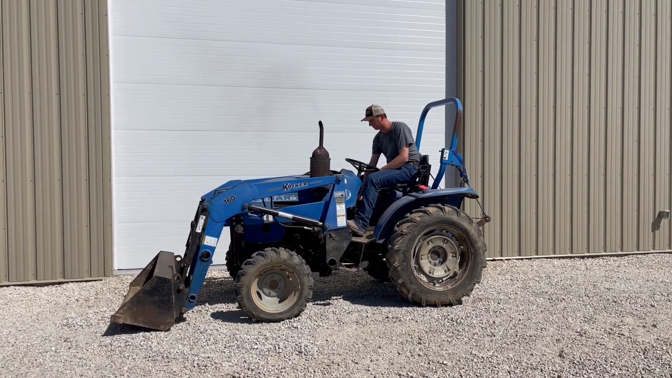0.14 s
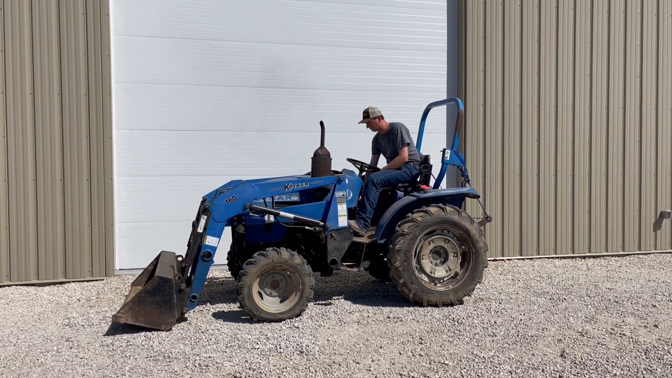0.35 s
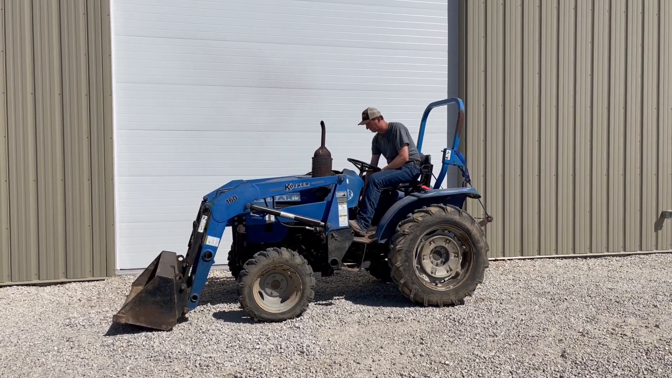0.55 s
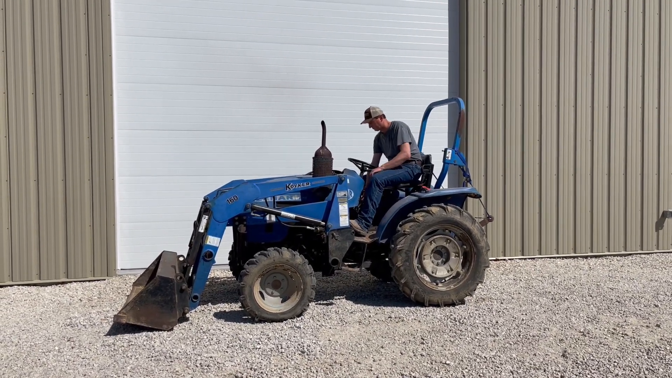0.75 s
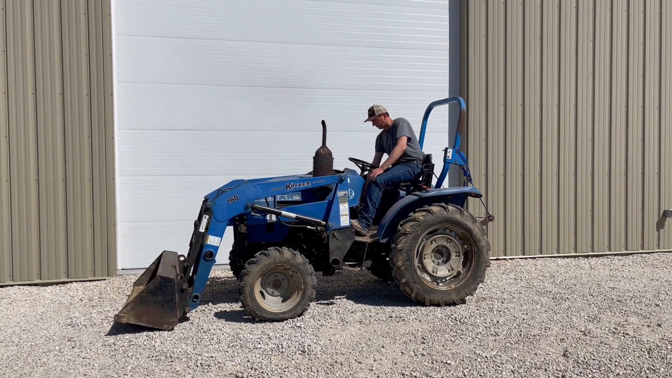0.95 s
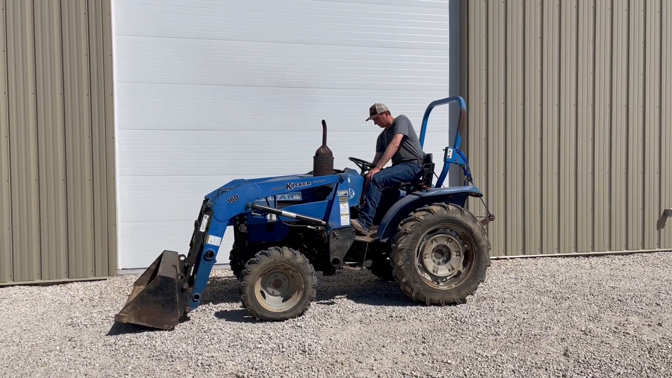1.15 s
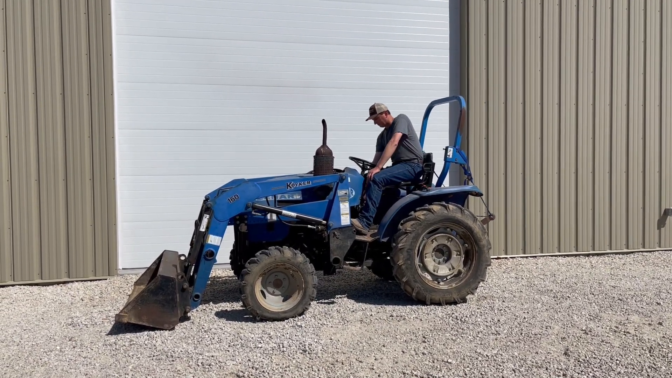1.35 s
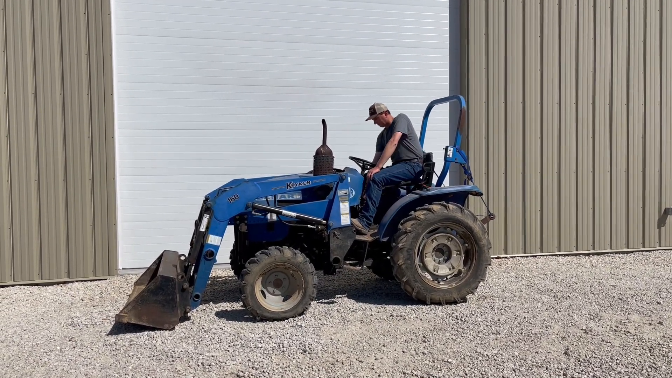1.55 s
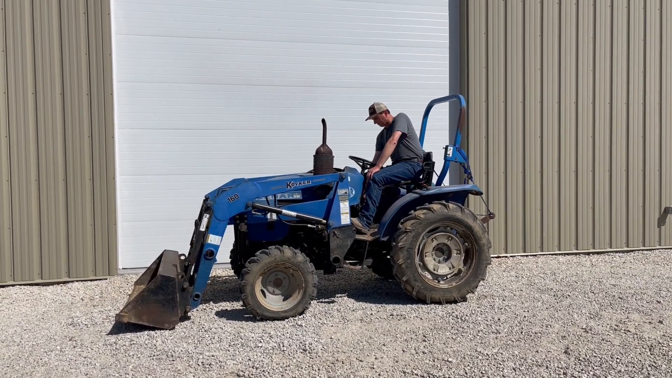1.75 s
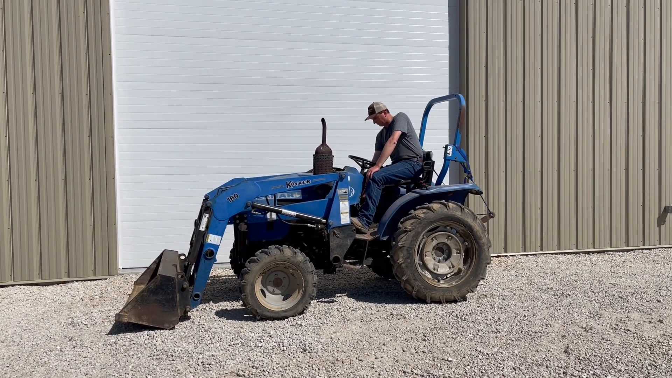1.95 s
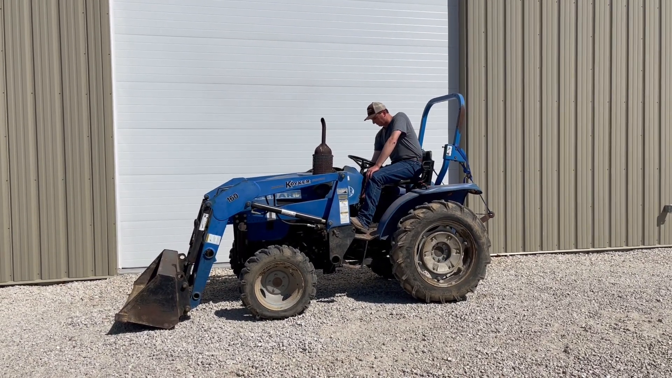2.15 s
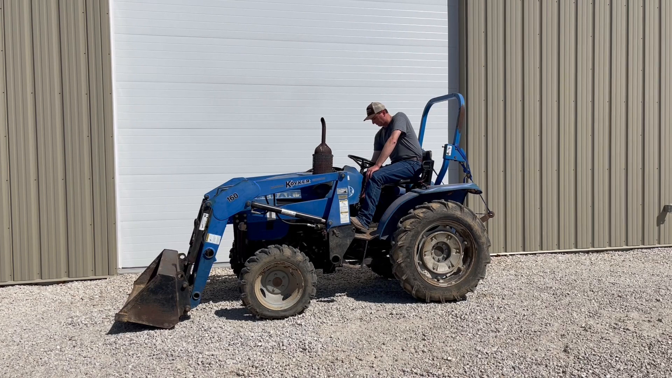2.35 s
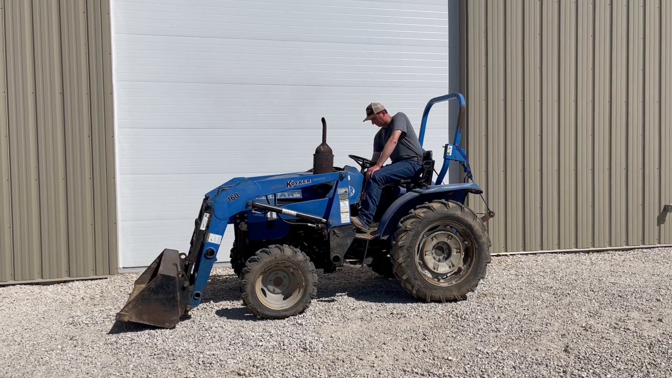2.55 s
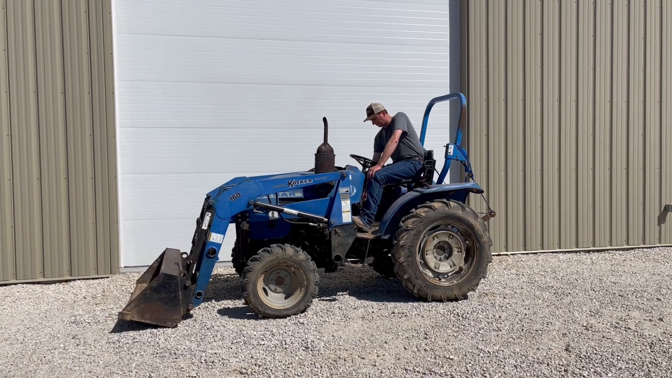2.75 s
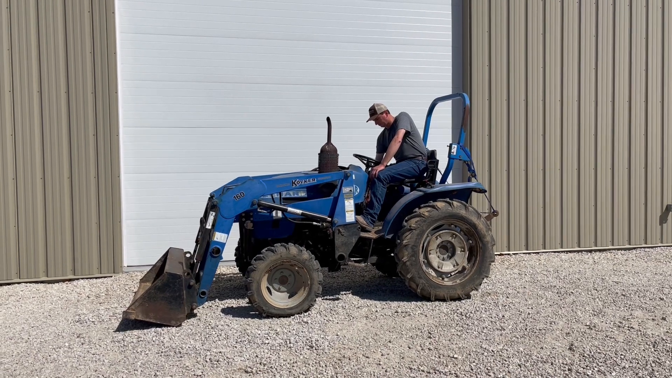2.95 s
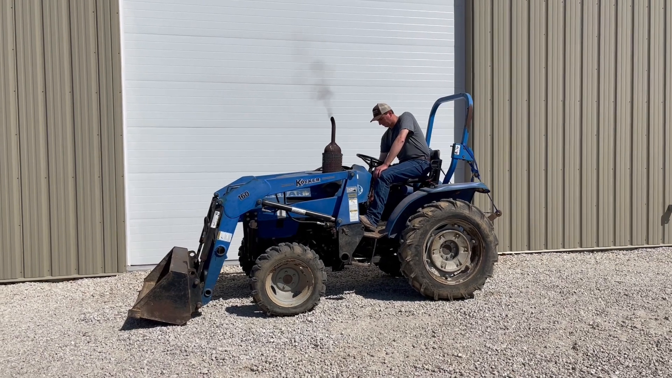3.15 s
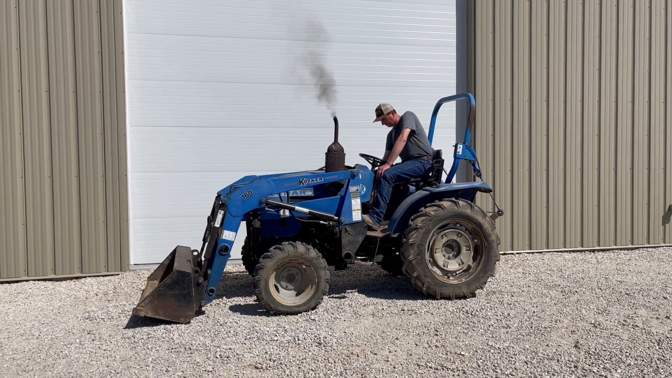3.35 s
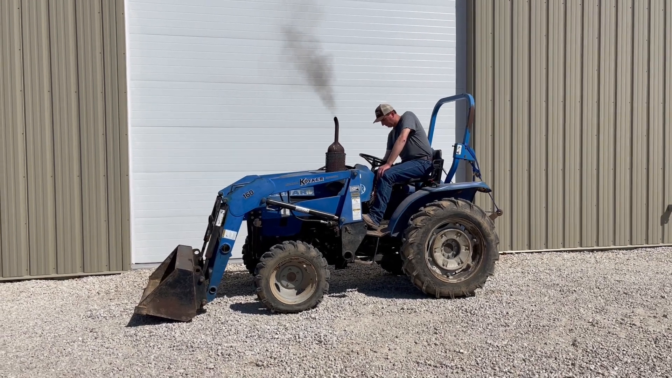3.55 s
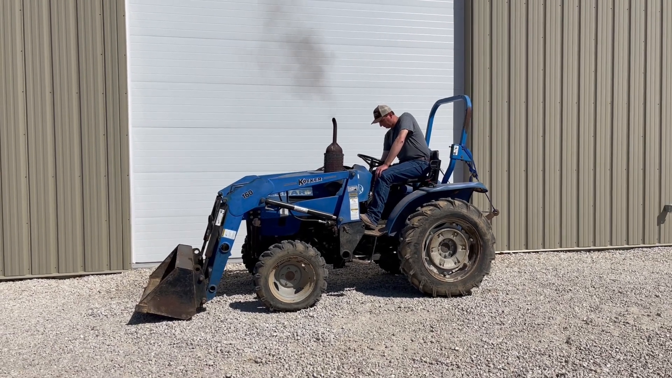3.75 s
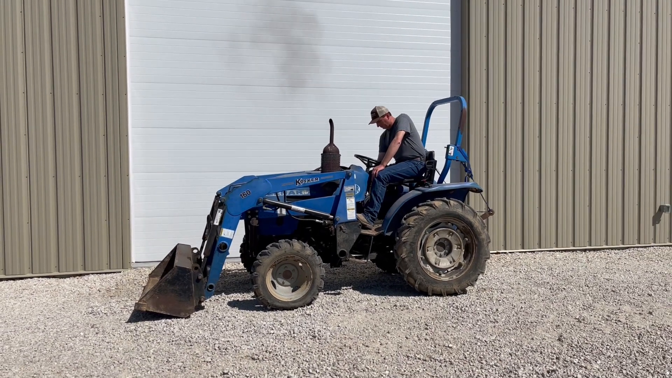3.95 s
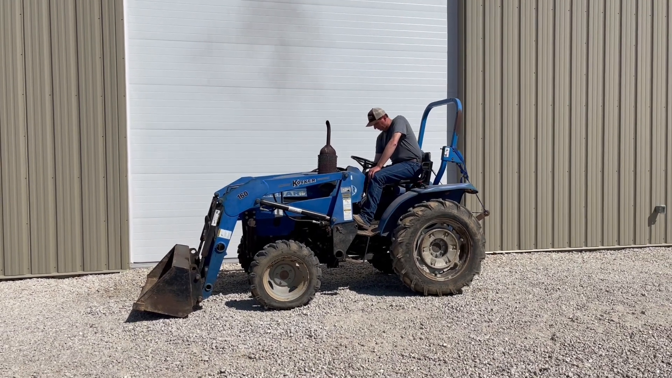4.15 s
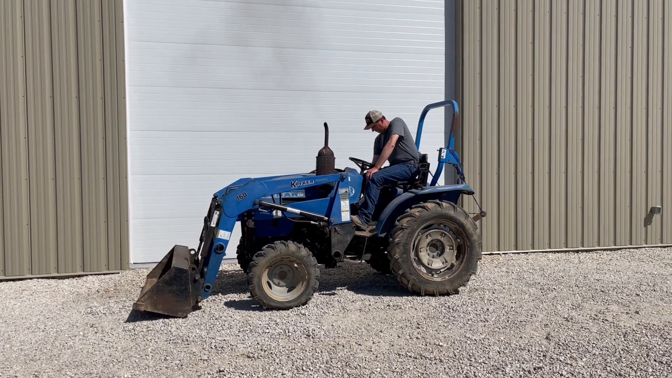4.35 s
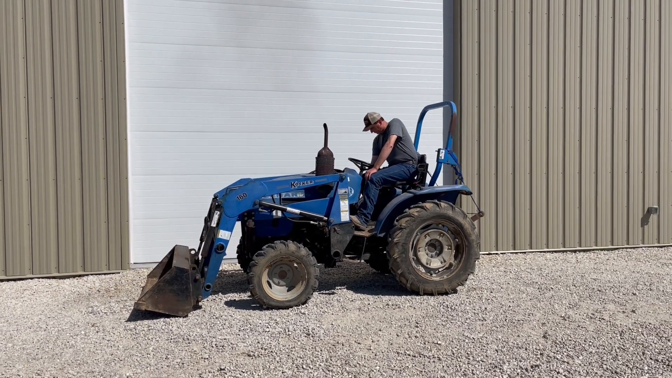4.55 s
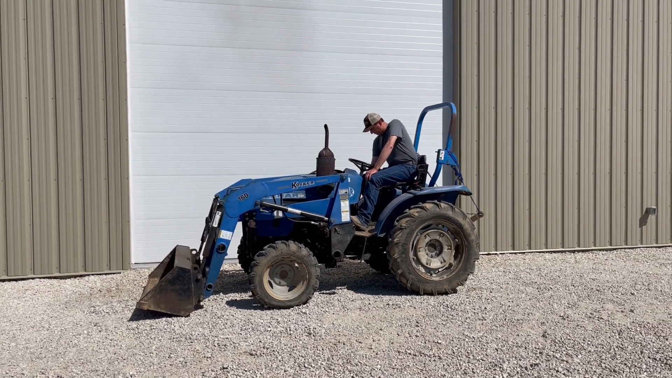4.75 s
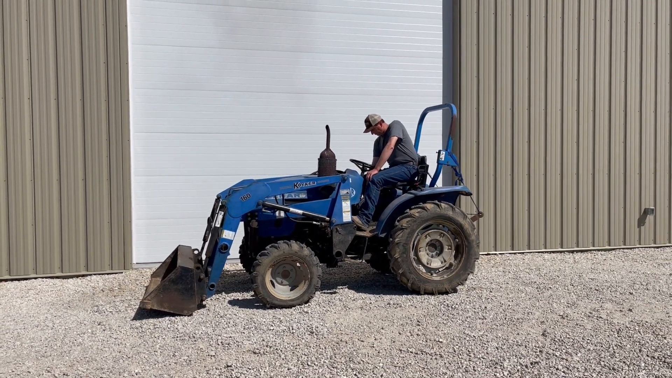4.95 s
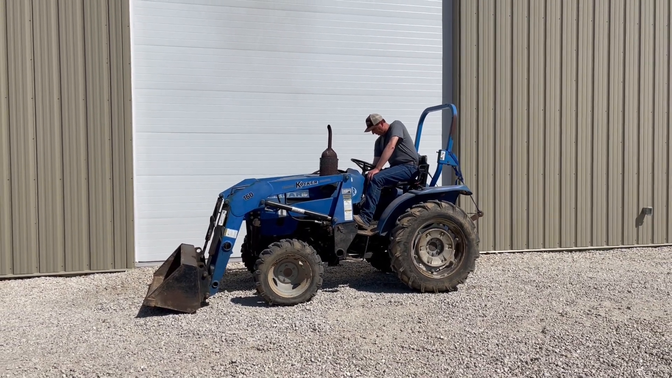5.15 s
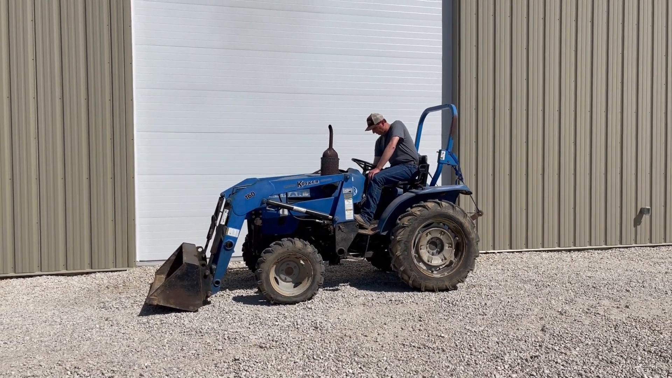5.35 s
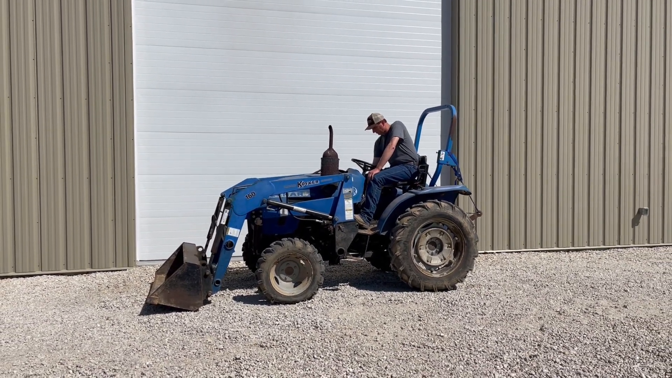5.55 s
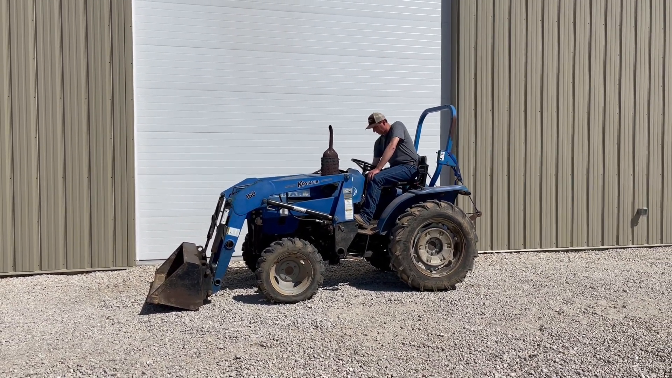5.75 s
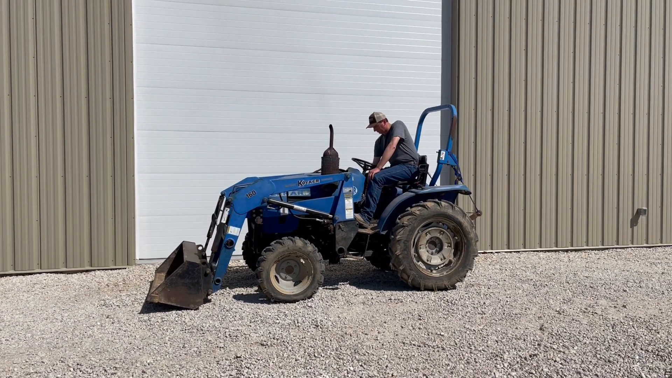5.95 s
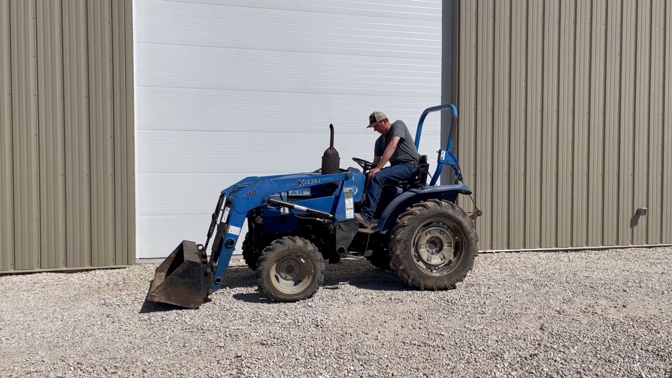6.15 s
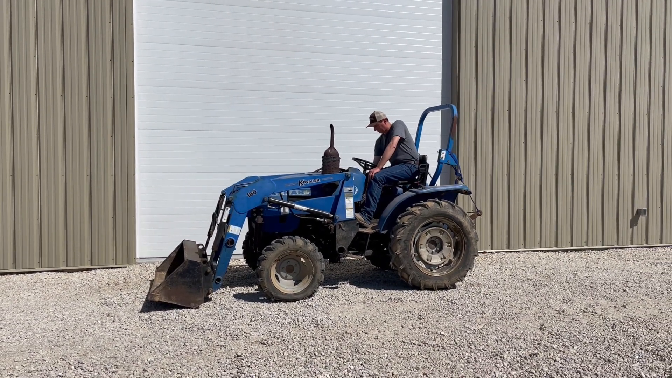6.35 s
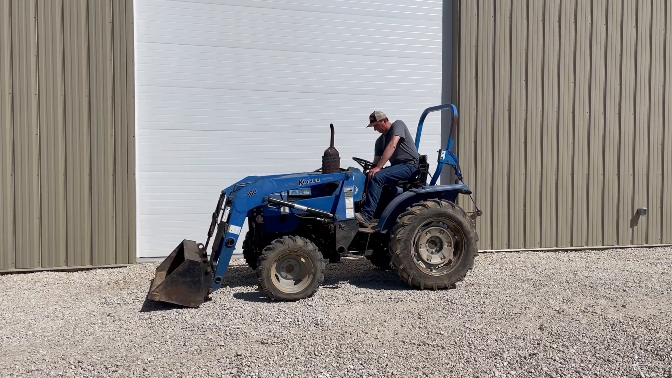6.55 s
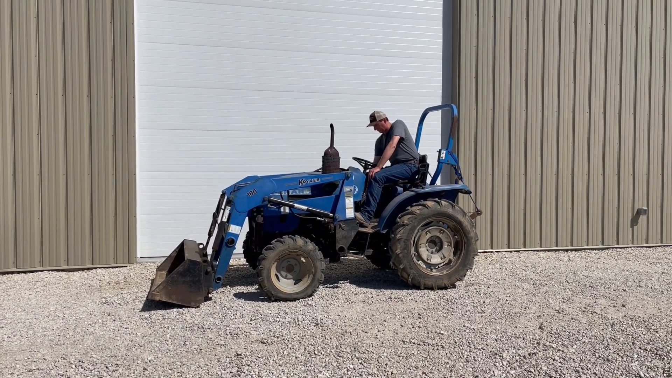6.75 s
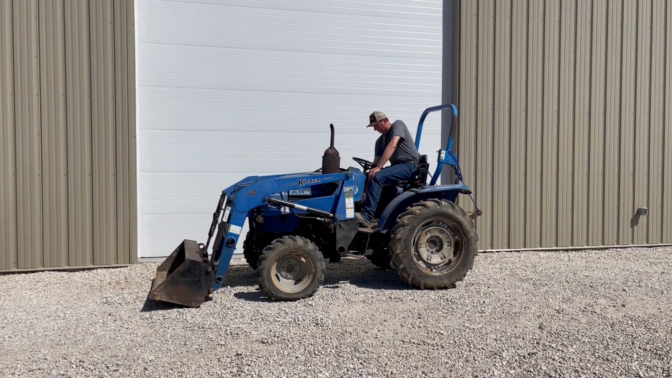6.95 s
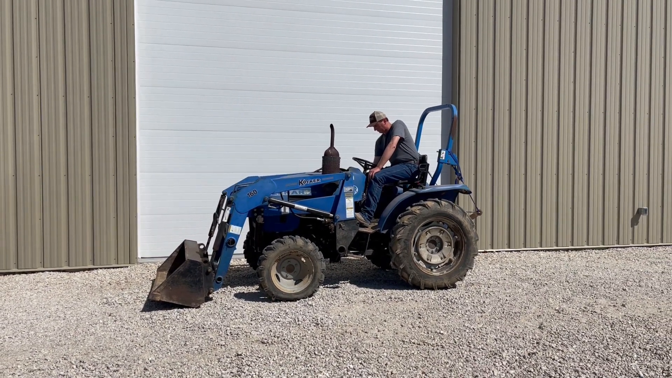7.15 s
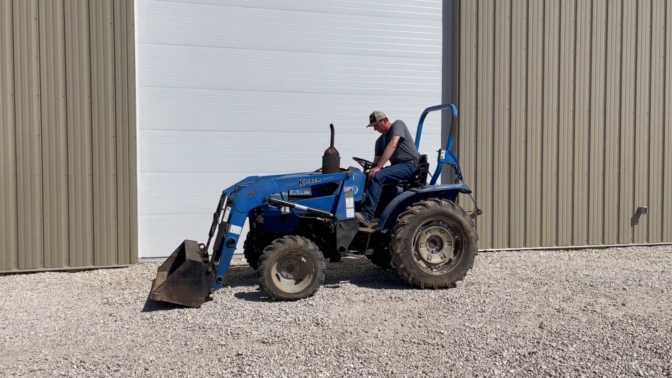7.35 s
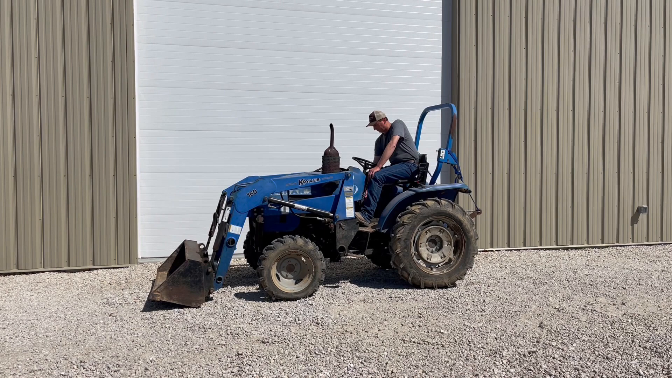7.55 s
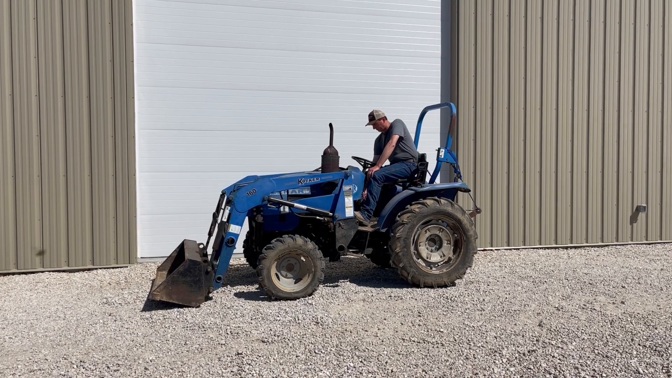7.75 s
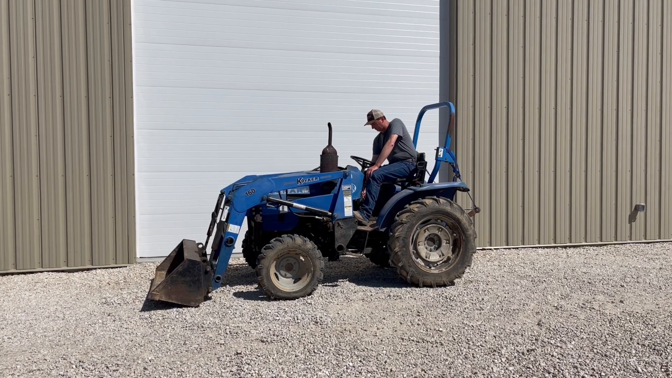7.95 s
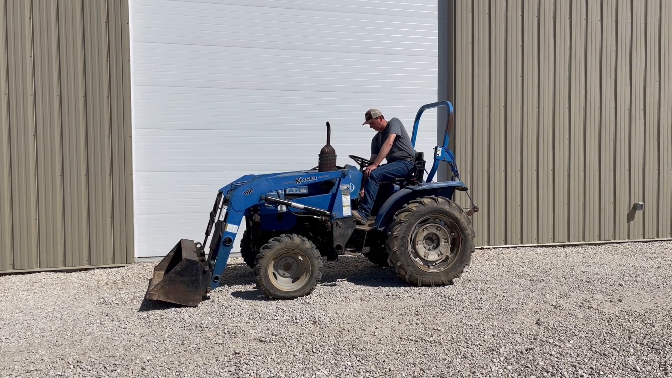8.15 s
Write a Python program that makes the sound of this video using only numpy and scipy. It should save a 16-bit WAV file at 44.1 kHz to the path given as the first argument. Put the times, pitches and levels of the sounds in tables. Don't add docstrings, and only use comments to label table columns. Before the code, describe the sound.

A small three-cylinder diesel tractor runs outdoors on gravel in front of a metal wall, heard in stereo from several metres away. From 0 to 2.7 seconds it idles slowly, about fifteen firings a second, with lumpy uneven knocks, one cylinder harder and rattling, valve ticks, soft exhaust puffs and buzzing thin panels. At about 2.8 it surges with a coughing exhaust, nearly doubling speed by 3.3, and holds briefly. From 3.9 to 4.7 it climbs again to a fuller, booming drone, steady until 5.6. A last harsh push lifts it to top speed by about 6.1, where it stays to the end at 8: loud, dense clatter merged into a roar, gear and fan wash, faint pump tones and a very thin high whine. A close wall echo thickens the knocks. Light wind bumps the microphones near 6.9 and again from 7.6.

```python
import sys
import numpy as np
from scipy import signal
from scipy.fft import rfft, irfft, next_fast_len
from scipy.io import wavfile
from scipy.ndimage import uniform_filter1d

SR = 44100
rng = np.random.default_rng(int(sys.argv[2]) if len(sys.argv) > 2 else 0)


def dump(signal):
    limited = np.clip(np.atleast_2d(signal).T, -1, 1)
    pcm = np.round(limited * 32767).astype(np.int16)
    wavfile.write(sys.argv[1], SR, pcm)


def undo_db(level):
    steps = np.asarray(level, float) / 20
    return 10 ** steps


N = 361619
TIME = np.arange(N) / SR

# time in seconds, firings per second.
ENGINE_SPEED = [(0.0, 15.19), (0.91, 14.98), (2.23, 15.06), (2.73, 15.27), (3.22, 26.68), (3.32, 27.93),
                (3.84, 27.06), (4.6, 39.66), (4.75, 40.65), (4.9, 40.85), (5.6, 40.98), (5.93, 46.91),
                (6.11, 48.18), (6.45, 48.56), (7.04, 47.7), (7.3, 47.55), (7.9, 47.83), (8.2, 47.47)]
# time in seconds, load from 0 (steady speed) to 1 (rack wide open).
FUEL_LOAD = [(0, 0), (2.7, 0), (2.86, 0.82), (3.0, 0.88), (3.16, 0.92), (3.31, 0.13), (3.8, 0.04),
             (3.96, 0.57), (4.5, 0.78), (4.72, 0.4), (5.56, 0.33), (5.7, 1), (5.86, 0.98), (6.02, 0.4),
             (6.6, 0.07), (8.2, 0.18)]

# firings per second, boom in dB, bark in dB, puff in dB.
EXHAUST_STEADY = [(15.2, -28, -35, -59.5), (26, -30.5, -24, -57), (43, -19.7, -21, -47),
                  (49.4, -24.5, -22.5, -47.5)]
EXHAUST_LOADED = [(18, -20, -33, -42), (28.2, -16.5, -29, -42), (35, -15, -22, -45), (44, -18, -21, -42)]
# pitch in Hz, signed strength for each of the three cylinders.
STACK_MODES = [(54, -0.22, -0.28, -0.31), (64.4, -0.46, -0.44, -0.55), (77.1, 0.76, 0.92, 0.82),
               (92.6, 0.6, 0.086, 0.28), (108.6, -0.6, -0.52, -0.18), (126.5, 0.42, 0.23, 0.22),
               (146.0, -0.37, 0.25, -0.075), (167.1, -0.35, -0.72, -1.05), (191.8, -0.39, -0.074, 0.29),
               (211.7, 0.47, 0.061, 0.057), (236, -0.15, -0.092, -0.098), (278, 0.058, 0.064, 0.038),
               (286.8, 0.11, 0.066, 0.15), (309, 0.097, 0.12, 0.011), (365, 0.045, -0.023, -0.0051),
               (404, 0.031, 0.00018, 0.038)]
# pitch in Hz, strength for each cylinder.
STACK_LOADED_MODES = [(112, 0.36, 0.2, 0.49), (214.7, 0.42, 0.21, 0.41)]
PULSE_LIKENESS = [(15, .01), (27.5, .2), (41, .4), (48, 0)]
# place in firings, level in dB.
PUFFS = [
    (.02, -0.92),
    (1.05, -0.67),
    (2.1, 0.4),
]
# frequency in Hz, level in dB per Hz.
JET_SPECTRUM = [(2500, -14), (4000, 16), (7000, -17.5), (9500, 5), (11500, 6), (13000, -6.5)]
# place in firings, level in dB.
COUGHS = [
    (.13, 0),
    (1.1, 0),
    (2.1, -8),
]
# frequency in Hz, level in dB per Hz.
COUGH_SPECTRUM = [(2500, -22), (3500, 3), (6000, 0), (9500, -1.5), (12000, -3), (13000, -20)]

# firings per second, drone in dB, knock in dB, tick in dB.
BODY_STEADY = [(15.5, -37, -33.5, -45.5), (26, -32, -27, -40), (39.8, -26.5, -21.5, -37.5),
               (44.4, -32, -21, -35.5)]
BODY_LOADED = [(19.4, -33, -30.5, -42), (27.2, -31.5, -23.5, -31.5), (36, -30, -20.5, -32),
               (46.7, -28.5, -19, -31.5)]
# place in firings, level in dB, gain at top speed in dB, share of long rattle.
KNOCKS = [
    (.73, -4.5, 3.5, .12),
    (1.73, -1.5, -.5, .1),
    (2.73, 2.5, -1.5, .4),
]
INJECTION_ADVANCE = [(15, .02), (27.5, .09), (41, .08), (48, 0)]
# pitch in Hz, width in Hz, level in dB.
BLOCK_RESONANCES = [(1075, 12, -9.5), (1282, 66, -3), (1383, 60, -2), (1514, 150, 1.5), (1577, 80, 2),
                    (1766, 117, -1.5), (1880, 91, 1.5), (2063, 80, 1.5), (2240, 81, 0.5), (2458, 101, 1),
                    (2718, 46, 1.5), (2980, 234, -7)]
# pitch in Hz, width in Hz, level in dB.
CLANG_RESONANCES = [(1480, 24, 38), (2150, 22, 40), (2330, 24, 36), (2750, 20, 40)]
# place in firings, level in dB.
TICKS = [
    (.40, 6.5),
    (1.411, 11.1),
    (1.97, 5.7),
    (2.411, 8),
    (2.82, 5.5),
]
# pitch in Hz, width in Hz, level in dB.
COVER_RESONANCES = [(3230, 540, 0), (4365, 130, 2), (4640, 270, 0.5), (5870, 2040, -5.5), (6500, 130, 2.5),
                    (7850, 2100, -11)]
# pitch in Hz, strength for each cylinder.
PANEL_MODES = [(410.2, 0.81, 0.62, 0.47), (468, 0.69, 0.49, 0.97), (586, 0.84, 1, 0.9),
               (622, 1.67, 0.099, 0.77), (735.7, 1.2, 0.53, 0.93), (649, 0.92, -0.28, 0.11),
               (760, 0.48, 0.54, .35), (903, 0.8, -0.038, 0.26), (1147, 0.6, 0.085, 0.07),
               (1263, 0.26, 0.11, 0.45)]
# pitch in Hz, strength for each cylinder.
BRACKET_MODES = [(4210, 1, 0.1, 0.1)]
# pitch in Hz, width in Hz, level in dB.
GEAR_RESONANCES = [(2415, 140, 3.5), (2987, 54, 9), (4254, 250, -3)]
# frequency in Hz, level in dB per Hz.
WASH_SPECTRUM = [(250, -6), (330, -13), (600, -9), (950, -12), (1480, -12), (2200, -9.5), (2900, -15.5),
                 (3600, -29), (6500, -38), (8400, -36.5), (11500, -30), (13000, -69)]
# multiple of the firing rate, level in dB.
PUMP_TONES = [(56 / 3, -39), (71 / 3, -41), (79 / 3, -43), (12, -42)]
# pitch in Hz, level in dB.
WHINE_TONES = [(11750, -73), (12800, -78)]
# time in seconds, level in dB.
WIND_LEVEL = [
    (0, -60),
    (6.75, -55),
    (6.9, -35),
    (7.0, -40),
    (7.1, -50),
    (7.55, -46),
    (7.65, -34),
    (7.9, -33),
    (8.2, -32),
]

# frequency in Hz, left-right likeness from 0 to 1.
PORT_LIKENESS = [(60, .99), (1000, .98), (2500, .93), (5000, .86), (9000, .88), (12300, .94)]
# frequency in Hz, left minus right in dB.
PORT_TILT = [(60, -2.0), (110, -2.5), (200, -3.0), (350, -2.5), (640, -3.5), (1150, -3.0), (2080, -2.5),
             (3770, 0.5), (6800, 1.5), (12300, 0.0)]
# frequency in Hz, lead of the left in radians.
PORT_LEAD = [(0, 0), (1810, 0.0), (3100, 1.4), (4390, 0.8), (5430, 1.2), (6290, 0.5), (7490, 0.8),
             (7840, 0.8), (8790, -0.2), (9130, -1.2), (9730, -2.6), (10400, -3.3), (11800, -6.2),
             (13200, -6.9)]


def in_time(rows):
    s, *columns = np.transpose(rows)
    return [np.interp(TIME, s, c) for c in columns]


def at_speed(rows, rate):
    return np.interp(rate, *np.transpose(rows))


def at_hz(points, hz):
    points = np.array(points)
    return np.interp(np.log(hz + 1), np.log(points[:, 0] + 1), points[:, 1])


def mapped(steady, loaded, rate):
    load, = in_time(FUEL_LOAD)
    steady_rate, *steady_db = np.transpose(steady)
    loaded_rate, *loaded_db = np.transpose(loaded)
    return [(1 - load) * np.interp(rate, steady_rate, low) + load * np.interp(rate, loaded_rate, high)
            for low, high in zip(steady_db, loaded_db)]


def butter(order, hz, kind="low"):
    return signal.butter(order, hz, kind, fs=SR, output="sos")


def even(x):
    power = uniform_filter1d(uniform_filter1d(x ** 2, size=8800), size=4400)
    return x / np.sqrt(power + 1e-12)


def coloured(spectrum):
    size = next_fast_len(N)
    hz = np.arange(size // 2 + 1) * SR / size
    noise = rfft(rng.standard_normal(size))
    return even(irfft(noise * undo_db(at_hz(spectrum, hz)), size)[:N])


def strikes(firings, contacts, spread_db, jitter_s):
    place, level_db = np.transpose(contacts)
    due = 3 * np.arange(-1, 90)[:, None] + place
    at = np.interp(due, firings, TIME, left=-1, right=-1)
    late, stronger = rng.standard_normal((2,) + at.shape)
    index = np.clip(((at + jitter_s * late) * SR).astype(int), 0, N - 1)
    clicks = np.full(N, 1e-18)
    np.add.at(clicks, index, undo_db(level_db + spread_db * stronger) * (at > 0))
    return clicks


def dying(clicks, t60):
    return signal.lfilter([1], [1, -undo_db(-60 / (t60 * SR))], clicks)


def resonances(x, peaks):
    out = 0
    for k, (hz, width, level_db) in enumerate(peaks):
        r = np.exp(-np.pi * width / SR)
        b = (1 - r * r) / 2 * np.array([1, 0, -1])
        a = [1, -2 * r * np.cos(2 * np.pi * hz / SR), r * r]
        out = out + (-1) ** k * undo_db(level_db) * signal.lfilter(b, a, x)
    return out


def rung_modes(firings, modes, t60, spread_db, alike=0):
    valves_open = .25
    pulses = np.array([strikes(firings, [(valves_open + k, 0)], spread_db, jitter_s=0) for k in range(3)])
    out, r = 0, undo_db(-60 / (t60 * SR))
    for hz, *strength in modes:
        w = 2 * np.pi * hz / SR
        own = np.dot(strength, pulses)
        shared = np.mean(strength) * pulses.sum(axis=0)
        drive = (1 - alike) * own + alike * shared
        out = out + signal.lfilter([0, np.sin(w)], [1, -2 * r * np.cos(w), r * r], drive)
    return out


def exhaust(firings, rate):
    boom_db, bark_db, puff_db = mapped(EXHAUST_STEADY, EXHAUST_LOADED, rate)
    load, = in_time(FUEL_LOAD)
    alike = np.clip(at_speed(PULSE_LIKENESS, rate) + 0.29 * load, 0, 1)
    opening = firings + .015 * rate
    pulses = rung_modes(opening, STACK_MODES, t60=.18, spread_db=.45, alike=alike)
    pulses = pulses + load * rung_modes(opening, STACK_LOADED_MODES, t60=.26, spread_db=.5)
    boom = signal.sosfiltfilt(butter(4, 120), pulses)
    bark = pulses - boom
    return undo_db(boom_db) * even(boom) + undo_db(bark_db) * even(bark) + undo_db(puff_db + 5) * puffs(firings)


def puffs(firings):
    clicks = strikes(firings, PUFFS, spread_db=4.0, jitter_s=.0019)
    gate = dying(dying(clicks, .0065), .048)
    return even(coloured(JET_SPECTRUM) * (gate / gate.mean() + 0.37))


def coughs(firings, rate):
    clicks = strikes(firings + .0115 * rate, COUGHS, spread_db=2.5, jitter_s=.001)
    gate = dying(dying(clicks, .016), .04)
    level_db = -36.5 - 2.5 * np.log2(rate / 24)
    load, = in_time(FUEL_LOAD)
    return undo_db(level_db) * load ** 2 * even(coloured(COUGH_SPECTRUM) * gate)


def body(firings, rate):
    drone_db, knock_db, tick_db = mapped(BODY_STEADY, BODY_LOADED, rate)
    speed_db = 20 * np.log10(rate / 48)
    burning = firings + .025 * rate
    bracket = even(rung_modes(burning, BRACKET_MODES, t60=.25, spread_db=2.5))
    gears = even(resonances(rng.standard_normal(N), GEAR_RESONANCES))
    wash_db = .5 * (drone_db + knock_db) - .5 + .25 * speed_db
    out = undo_db(knock_db - 4.0) * knock(burning + at_speed(INJECTION_ADVANCE, rate), rate)
    out = out + undo_db(tick_db - 3.0) * valve_ticks(firings, rate)
    out = out + undo_db(-51 + 6 * speed_db) * bracket
    out = out + panels(burning, drone_db, speed_db)
    out = out + undo_db(knock_db - 14.5 + 0.8 * speed_db) * gears
    return out + undo_db(wash_db) * coloured(WASH_SPECTRUM)


def knock(firings, rate):
    shake, clang, age = 0, 0, np.arange(4000) / SR
    top = np.clip((rate - 42) / 6, 0, 1)
    idle = np.clip((30 - rate) / 15, 0, 1)
    for place, level_db, top_db, rattle in KNOCKS:
        mood_db = idle * np.interp(firings / 3, np.arange(90), rng.normal(0, 1.8, 90))
        fade = undo_db(-60 * age / .05) + rattle * undo_db(-60 * age / .17)
        blows = strikes(firings, [(place, level_db)], spread_db=1.3, jitter_s=.00005)
        blows = blows * undo_db(top_db * top + mood_db)
        habit = signal.fftconvolve(blows, fade * rng.standard_normal(4000))[:N]
        fresh = signal.fftconvolve(blows, fade)[:N] * rng.standard_normal(N)
        shake = shake + 14.0 * blows + habit + .5 * fresh
        clang = clang + rattle * idle * blows
    rung = resonances(shake, BLOCK_RESONANCES) + resonances(clang, CLANG_RESONANCES)
    rung = signal.sosfilt(butter(4, 3500), rung)
    wall = np.interp(TIME - .0058, TIME, rung, left=0)
    return even(rung + undo_db(-8.0) * wall)


def valve_ticks(firings, rate):
    taps = strikes(firings + .003 * rate, TICKS, spread_db=2.0, jitter_s=.00095)
    return even(resonances(dying(taps, .13) * rng.standard_normal(N), COVER_RESONANCES))


def panels(firings, drone_db, speed_db):
    drone = even(rung_modes(firings, PANEL_MODES, t60=.4, spread_db=.6))
    peaks = [(hz, 50, 20 * np.log10(abs(first))) for hz, first, *_ in PANEL_MODES]
    rumble = even(resonances(rng.standard_normal(N), peaks))
    return undo_db(drone_db - 2.5 + .6 * speed_db) * drone + undo_db(drone_db - 9 - .4 * speed_db) * rumble


def pump(firings, rate):
    tones = 0
    for multiple, level_db in PUMP_TONES:
        waver = signal.sosfiltfilt(butter(2, 3), rng.standard_normal(N))
        level = undo_db(level_db + 2 * waver / waver.std())
        tones = tones + level * np.sin(2 * np.pi * multiple * firings)
    return np.clip((rate - 45) / 3, 0, 1) * tones


def whine():
    return sum(undo_db(db) * np.sin(2 * np.pi * hz * TIME) for hz, db in WHINE_TONES)


def wind():
    lumps = signal.sosfilt(butter(2, 9), rng.standard_normal((2, N)))
    rush = signal.sosfilt(butter(2, [40, 170], "band"), rng.standard_normal((2, N)))
    level_db = in_time(WIND_LEVEL)[0] + 4 * lumps / lumps.std() - 2
    return undo_db(level_db) * rush / rush.std()


def ports(x):
    size = next_fast_len(N + 4096)
    hz = np.arange(size // 2 + 1) * SR / size
    flutter = signal.sosfilt(butter(2, [15, 90], "band"), rng.standard_normal(N))
    share = np.sqrt(np.clip(1 - at_hz(PORT_LIKENESS, hz), 0, 1) / 2)
    unlike = share * rfft(x * flutter / flutter.std(), size)
    common = rfft(x, size)
    half = undo_db(at_hz(PORT_TILT, hz) / 2) * np.exp(.5j * at_hz(PORT_LEAD, hz))
    return irfft(np.array([half * (common + unlike), (common - unlike) / half]), size)[:, :N]


def scene():
    rate, = in_time(ENGINE_SPEED)
    firings = np.cumsum(rate) / SR
    engine = exhaust(firings, rate) + coughs(firings, rate) + body(firings, rate) + whine()
    return ports(engine) + pump(firings, rate) * undo_db([[-1.6], [1.6]]) + wind()


def roll_off(x):
    return signal.sosfilt(signal.butter(12, 12890, fs=SR, output="sos"), x)


def record(dry):
    rounded = 1.1 * np.tanh(dry / 1.1)
    left, right = signal.sosfilt(butter(3, 40, "high"), rounded)
    sum_gap = butter(2, [9950, 10500], "bandstop")
    top_cut = signal.cheby2(12, 50, 13250, fs=SR, output="sos")
    side_cut = signal.cheby2(10, 30, 12100, fs=SR, output="sos")
    mid = signal.sosfiltfilt(np.vstack([sum_gap, top_cut]), left + right) / 2
    side = signal.sosfiltfilt(side_cut, left - right) / 2
    return roll_off(np.array([mid + side, mid - side]))


dry = scene()
out = record(dry)
dump(out)
```